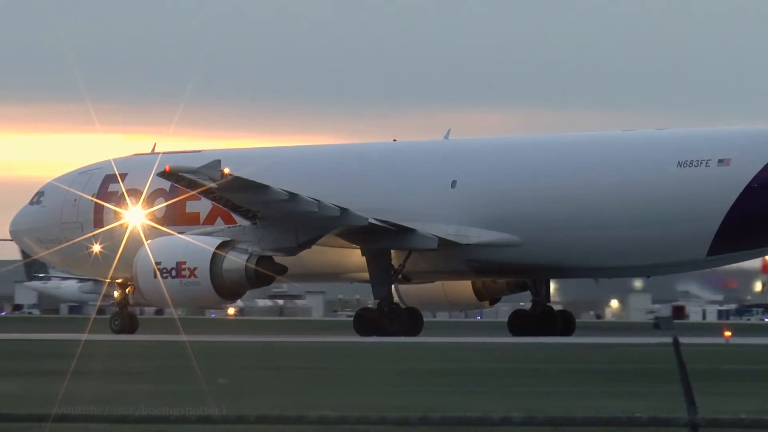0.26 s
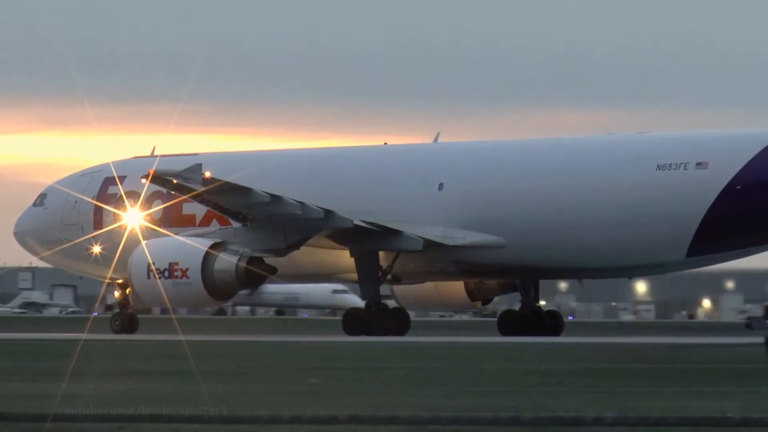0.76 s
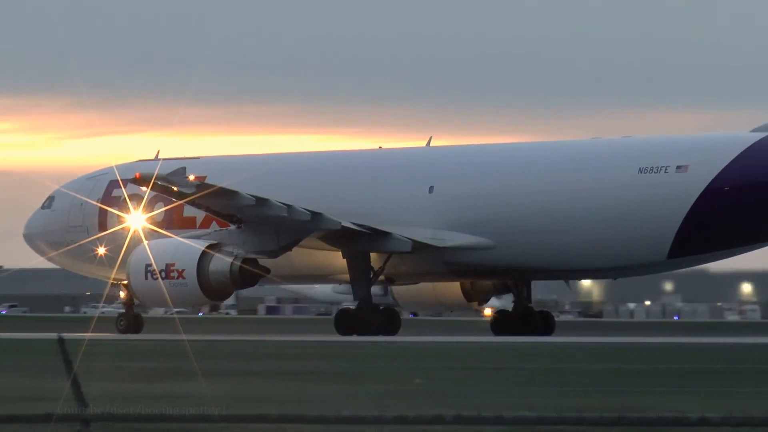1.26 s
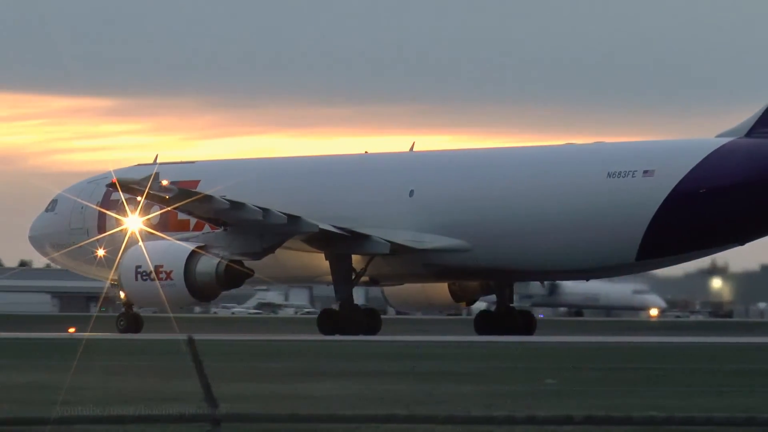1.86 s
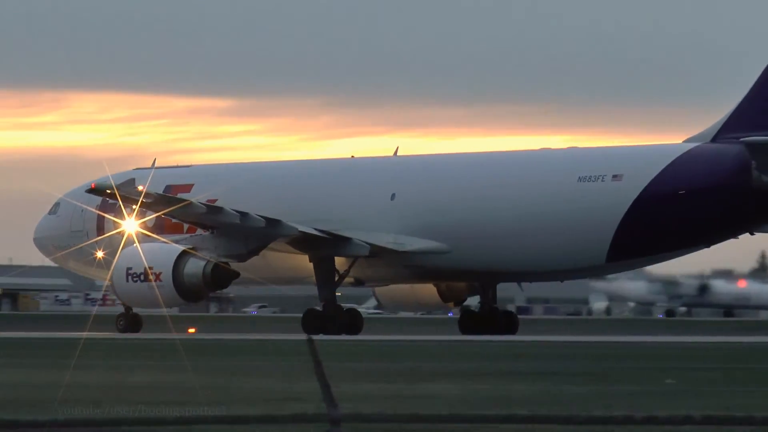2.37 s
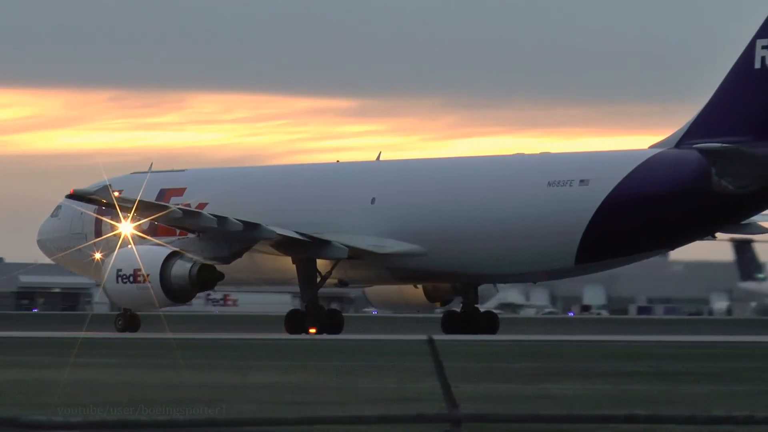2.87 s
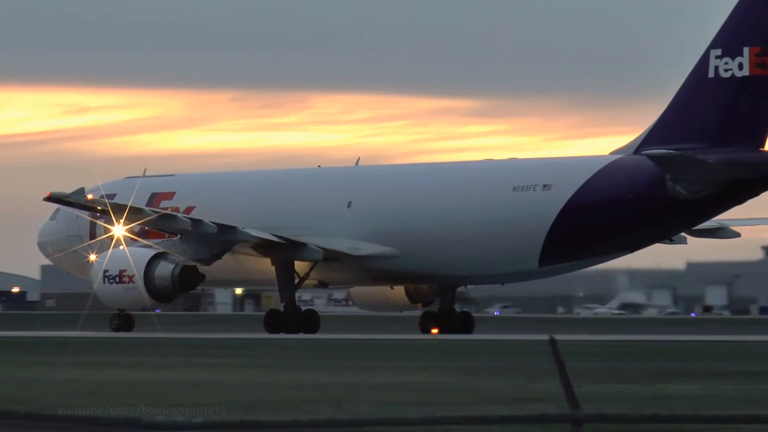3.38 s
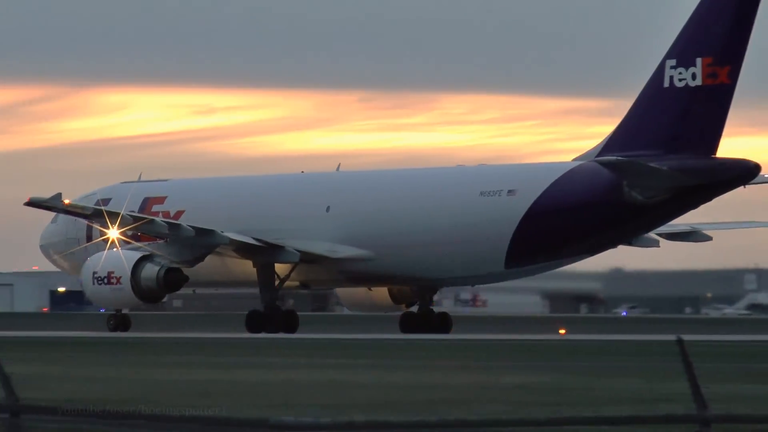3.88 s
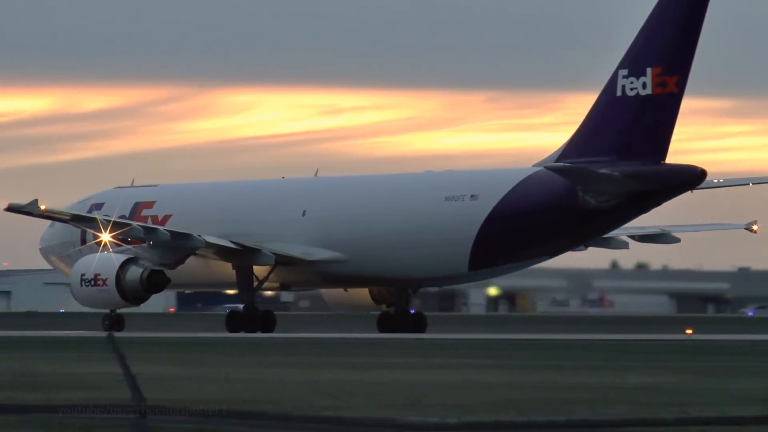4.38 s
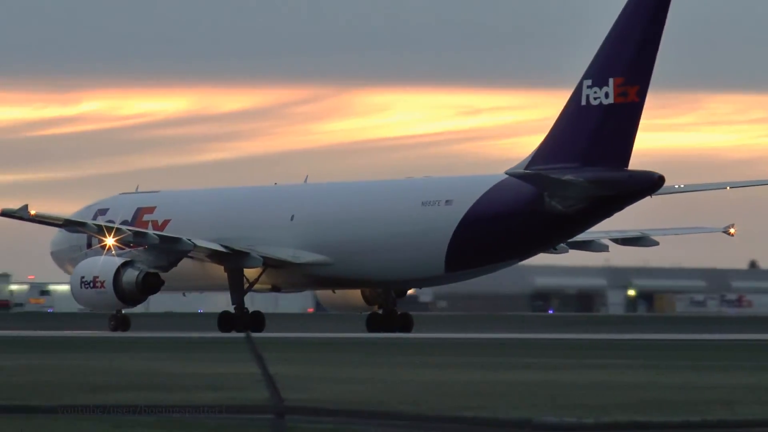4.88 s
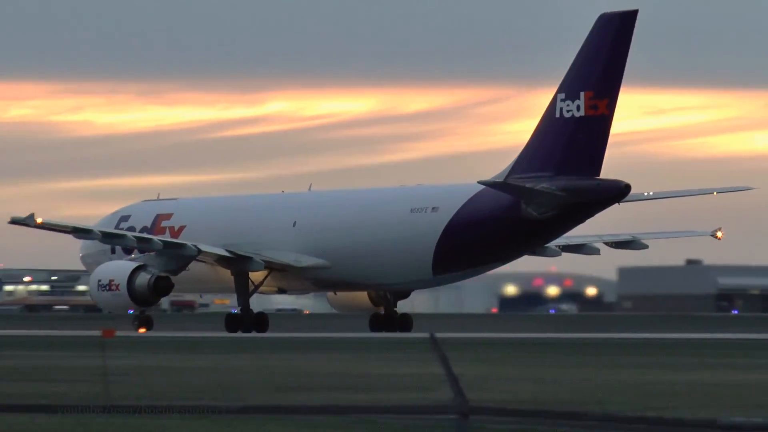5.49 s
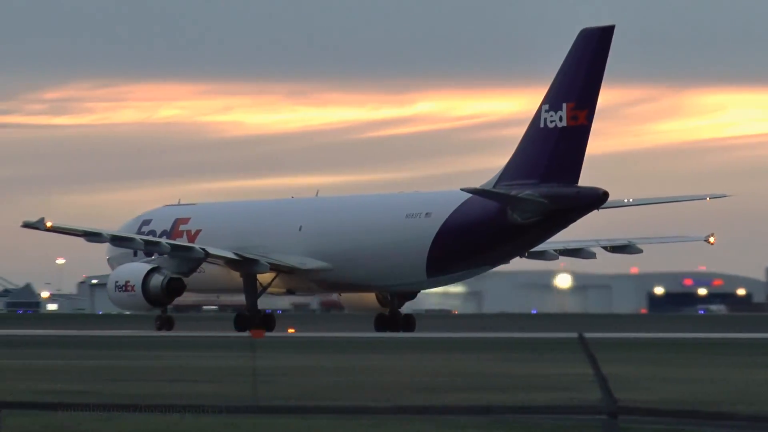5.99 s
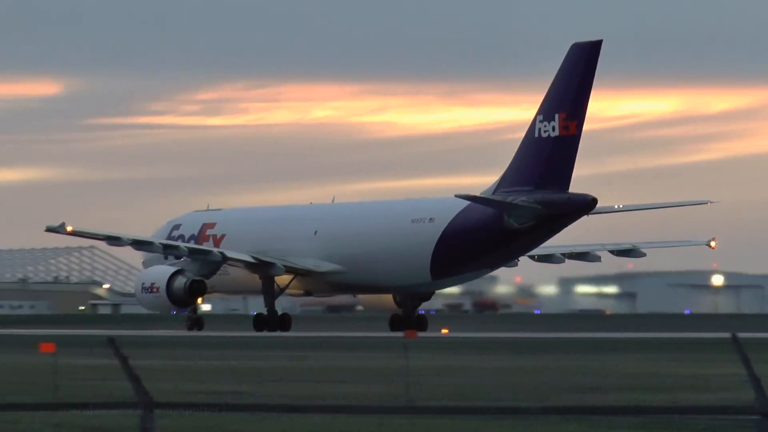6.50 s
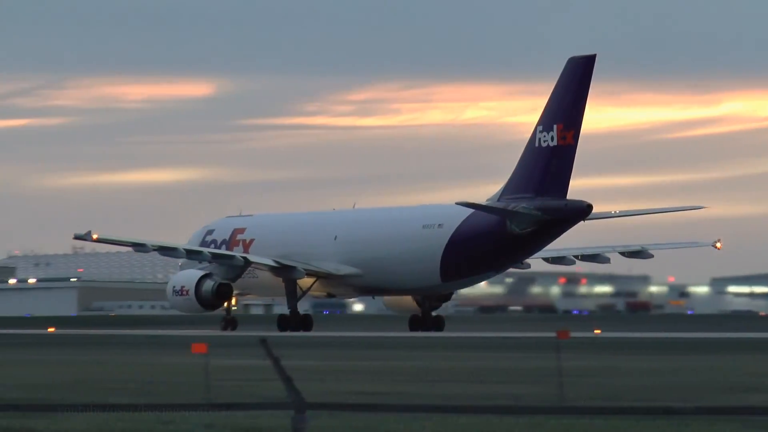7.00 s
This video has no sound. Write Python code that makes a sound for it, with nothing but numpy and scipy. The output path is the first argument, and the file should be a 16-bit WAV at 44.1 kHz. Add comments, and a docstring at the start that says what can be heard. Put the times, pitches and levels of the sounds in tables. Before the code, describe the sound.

Heavy, buffeting jet exhaust rumble and a hoarse roar, bright at first, grow duller as a large aircraft accelerates into the distance.

```python
"""Beside an airport runway, across the grass: a twin-jet airliner spools up and rolls away.
The exhaust rumbles in the bass and roars in the middle: both are shaped noise that swells and sinks.
A fan whines as wavering tones wrapped in noise, and the treble fades with distance.
Strong surges of the rumble overload a small microphone: troughs are clipped, the gain control ducks.
Faint hisses, a low flutter, a few puffs of air and tiny electronic ticks lie underneath."""
import sys
import numpy as np
from scipy import signal
from scipy.fft import rfft, irfft, next_fast_len
from scipy.io import wavfile
from scipy.ndimage import uniform_filter1d

SR = 44100
rng = np.random.default_rng(int(sys.argv[2]) if len(sys.argv) > 2 else 0)


def wav_out(sig):
    """Save sig, one row per channel (or a flat mono array), as 16-bit PCM at SR to the path in sys.argv[1]."""
    wavfile.write(sys.argv[1], SR, np.round(np.clip(np.atleast_2d(sig).T, -1, 1) * 32767).astype(np.int16))


N = 319725  # length in samples
TIME_S = np.arange(N) / SR


def from_db(db):
    """Turn a level in dB into a gain."""
    return 10 ** (np.asarray(db) / 20)


def rms_one(x):
    """Scale a sound to an rms of 1."""
    return x / np.sqrt(np.mean(x ** 2) + 1e-20)


def in_time(rows):
    """Draw straight lines through a table whose first column is time; one curve per other column."""
    row_s, *columns = np.transpose(rows)
    return [np.interp(TIME_S, row_s, column) for column in columns]


def drift(corner_hz):
    """Slow random wandering, rms about 1: noise at every 40th sample, smoothed twice by a low-pass."""
    r = np.exp(-80 * np.pi * corner_hz / SR)
    noise = rng.standard_normal(N // 40 + 2002)
    slow = signal.lfilter([1], [1, -2 * r, r * r], noise)[2000:]  # drop the filter's start
    return np.interp(np.arange(N) / 40, np.arange(len(slow)), rms_one(slow))


def noise_bands(spectrum):
    """Split shaped noise of total rms about 1 into overlapping half-octave bands: (centre Hz, band)."""
    size = next_fast_len(N)
    hz = np.maximum(np.arange(size // 2 + 1) * SR / size, 1)
    point_hz, point_db = np.transpose(spectrum)
    shape = from_db(np.interp(np.log(hz), np.log(point_hz), point_db, left=-200, right=-200))
    noise = rfft(rng.standard_normal(size)) * shape / np.sqrt(np.mean(shape ** 2))
    first_step = np.floor(2 * np.log2(point_hz[0]))
    for step in np.arange(first_step, 2 * np.log2(point_hz[-1]) + 1):
        share = np.clip(1 - abs(2 * np.log2(hz) - step), 0, 1)
        yield 2 ** (step / 2), irfft(noise * share, size)[:N]


def halo(phase, corner_hz):
    """Noise crowded round a tone, rms about 1: the tone's two quarter-turn parts wander at random."""
    return drift(corner_hz) * np.sin(phase) + drift(corner_hz) * np.cos(phase)


# strong pressure surges in the rumble:
# trough_s [s], swell_db [dB], pitch_hz [Hz], lead_cycles [cycles by which the swell leads the trough]
SURGE_LIST = [(0.374, 1, 105, 0.13), (.625, -2.5, 94, 0.33), (0.837, -5, 143, 0.39),
              (0.883, -4, 123, 0.032), (1.059, -2.5, 119, -0.14), (1.155, -4.5, 139, 0.036),
              (1.293, -5, 120, 0.074), (1.332, -2, 119, -0.11), (1.381, -4.5, 109, 0.053),
              (1.421, -4, 110, 0.025), (1.505, -1.5, 110, -0.11), (1.665, -2.5, 122, 0.058),
              (1.731, -2, 95, 0.12), (1.854, -1.5, 100, -0.081), (1.942, -3, 107, 0.25),
              (2.096, -3, 132, 0.14), (2.191, -5, 109.5, -0.21), (2.239, -4, 81.4, 0.041),
              (2.372, -2.5, 130, -0.015), (2.455, -1.5, 75, 0.031), (2.53, -5, 112, -0.049),
              (2.594, -6.5, 110, 0), (2.614, -1.5, 63.4, -0.22), (2.643, -3.5, 130, 0.32),
              (2.733, -5, 82.6, 0), (2.86, -4.5, 85, -0.051), (2.882, -2.5, 99, 0.22),
              (3.025, -5, 100, -0.033), (3.086, -2.5, 120, 0.13), (3.208, -3.5, 130, 0.023),
              (3.245, -4.5, 90, -0.03), (3.279, -5.5, 110, 0.29), (3.359, -6, 102, 0),
              (3.395, -2, 110, 0.2), (3.52, -3, 120, 0.13), (3.584, -1.5, 109, -0.28),
              (3.698, -3, 100.5, 0.018), (3.716, -3.5, 110, -0.029), (3.745, -1.5, 97, 0.059),
              (3.757, -2.5, 106.5, 0.23), (3.855, -1, 101, 0.34), (3.956, -1.5, 91, -0.23),
              (4.109, -2.5, 76.4, -0.016), (4.175, -4.5, 107, -0.1), (4.283, -2.5, 96, 0.039),
              (4.573, -3, 96.5, 0.11), (4.665, -6, 102, -0.059), (4.74, -3, 107, 0.13),
              (4.844, -4.5, 101, 0.069), (4.903, -2.5, 105, -0.034), (5.111, -5, 85.6, -0.048),
              (5.182, -2.5, 81, -0.16), (5.346, -3.5, 80, 0.039), (5.572, -5, 106, -0.0073),
              (5.654, -2, 120, 0.028), (5.961, -5, 93, 0.018), (6.023, -4, 98, 0.19),
              (6.096, -2, 90, -0.014), (6.421, -4.5, 99, -0.084), (6.672, -2.5, 115, 0.37),
              (6.7228, -1.5, 84, 0.35), (6.748, -4.5, 91, 0.08), (6.84, -1, 91, -0.032),
              (7.065, -4.5, 109, 0.073)]


def surges():
    """Eddies fall into step as one tall swell; also returns the gain that makes room for it."""
    swell, calm = np.zeros(N), np.ones(N)
    for trough_s, swell_db, pitch_hz, lead_cycles in SURGE_LIST:
        near = slice(max(round((trough_s - .04) * SR), 0), round((trough_s + .04) * SR))
        cycles = (TIME_S[near] - trough_s) * pitch_hz
        bell = np.exp(-((cycles + lead_cycles) / .62) ** 2)
        swell[near] -= from_db(swell_db) * bell * np.cos(2 * np.pi * cycles)
        calm[near] *= 1 - np.sqrt(bell)
    return swell, calm


# colour of the exhaust rumble, only the shape counts: pitch_hz [Hz], density_db [dB per Hz]
RUMBLE_COLOUR = [(9.4, -48.5), (16, -31.5), (51, -2.5), (95, 1), (175, -7), (234, -14.5), (275, -24.5),
                 (330, -37), (430, -68.5), (730, -120)]
# the rumble deepens as the aircraft leaves; levels are before its waves are evened out:
# start_s [s], level_db [dB], tilt_db [dB per octave]
RUMBLE_COURSE = [(0, -15, 3), (1.5, -12.5, 2), (2.4, -13, 1), (3.3, -10, -1), (4.2, -11.5, -2),
                 (4.9, -13.5, -3), (5.6, -15, -4), (6.5, -13, -3), (7.25, -13, -7)]
RUMBLE_MIDDLE_HZ = 91  # the tilt turns about this pitch
WAVE_TOP_DB = -4.5  # between surges the waves level off at this height


def rumble():
    """Large exhaust eddies: low noise with its waves kept to an even height, broken by taller surges."""
    level_db, tilt_db = in_time(RUMBLE_COURSE)
    eddies = 0
    for hz, band in noise_bands(RUMBLE_COLOUR):
        band_db = 1.1 * drift(7.2) + tilt_db * np.log2(hz / RUMBLE_MIDDLE_HZ)
        eddies = eddies + band * from_db(band_db)
    eddies = from_db(level_db) * eddies
    outline = abs(signal.hilbert(eddies, next_fast_len(N))[:N])
    height = uniform_filter1d(outline, size=200)
    eddies = eddies / (1 + (height / from_db(WAVE_TOP_DB)) ** 4) ** (1 / 4)
    swell, calm = surges()
    return eddies * calm + swell


# colour of the roar far off, only the shape counts: pitch_hz [Hz], density_db [dB per Hz]
ROAR_COLOUR = [(200, -40.5), (280, -13.5), (400, -8.5), (560, -6.5), (750, -7.5), (950, -5), (1280, -2),
               (1670, -3), (1980, -6), (2580, -11), (3100, -12.5), (3400, -14.5), (3750, -18.5),
               (4000, -24), (4740, -34.5), (6160, -45), (8000, -56.5), (10500, -71), (15000, -77.5)]
# how nearness recolours the roar, as air and grass take less: pitch_hz [Hz], change_db [dB when abreast]
NEAR_COLOUR = [(280, 1), (700, 3.5), (1400, 2.5), (2500, -2.5), (3200, 4), (3900, 9), (5000, 13.5),
               (7000, 16), (9000, 11), (13000, 8)]
# the roar swells and sinks as the air carries it, before recolouring: start_s [s], level_db [dB]
ROAR_COURSE = [(0, -28.5), (.33, -26.5), (.6, -28.5), (.9, -29), (1.25, -27.5), (1.7, -27), (1.95, -28),
               (2.2, -29.5), (2.45, -28.5), (2.7, -27.5), (2.92, -30.5), (3.1, -26.5), (3.3, -28.5),
               (3.5, -29), (3.8, -28.5), (4.15, -29.5), (4.4, -29.5), (4.6, -29), (4.82, -30.5),
               (4.95, -31), (5.3, -32.5), (5.9, -33), (6.15, -34), (6.45, -31.5), (6.7, -30), (6.83, -31.5),
               (7, -34), (7.25, -32)]
LEAVING_S = 2.85  # nearness falls from 1 (abreast) as a bell of this width


def roar():
    """Mixing noise of the jets: turbulent air makes it patchy and distance changes its colour."""
    level_db, = in_time(ROAR_COURSE)
    nearness = np.exp(-(TIME_S / LEAVING_S) ** 2)
    near_hz, near_db = np.transpose(NEAR_COLOUR)
    gusts_db = 0.16 * drift(1.0) + 0.22 * drift(22)  # shared by all bands
    out = 0
    for hz, band in noise_bands(ROAR_COLOUR):
        change_db = np.interp(np.log(hz), np.log(near_hz), near_db)
        out = out + band * from_db(gusts_db + .5 * drift(3.0) + nearness * change_db)
    return from_db(level_db) * out


# the fan speeds up, then slowly sags as the aircraft draws away: start_s [s], pitch_hz [Hz, blade passing]
FAN_PITCH = [(0, 1640), (.4, 1683), (1, 1747), (1.3, 1780), (1.6, 1806), (2.2, 1850), (3, 1905),
             (4.7, 1950), (6.6, 1913), (7.25, 1900)]
# the two lower fan tones fade in and out: start_s [s], blade_tone_db [dB], octave_db [dB]
LOWER_TONES = [(0, -33, -36.5), (.1, -32, -38.5), (.15, -33, -43), (.22, -34.5, -39), (.33, -30, -37.5),
               (.45, -33.5, -40), (.56, -32, -40), (.65, -34, -40.5), (.76, -30.5, -33), (.83, -32, -33.5),
               (.9, -37, -34.5), (1.04, -35.5, -35), (1.1, -35.5, -47), (1.25, -38, -44),
               (1.35, -36.5, -43), (1.43, -45, -39.5), (1.58, -42, -36.5), (1.7, -46, -40),
               (1.78, -45, -51), (2.1, -50, -59), (3, -53, -55), (4.2, -58, -66.5), (5.1, -46, -72.5),
               (5.6, -48, -75), (6, -44, -77), (6.5, -44, -79), (6.7, -55, -80), (7.25, -57, -84)]
# third to sixth fan tones, steady and then lost: level_db [dB], fade_start_s [s], loss_db [dB per s]
UPPER_TONES = [(-64.5, 1.5, 2.5), (-62, 1.3, 18.5), (-73.5, .5, 8.5), (-82, .3, 12.5)]
# how the air blurs each fan tone, lowest first:
# line_share [0-1 of the power left as a clear tone], halo_hz [Hz, corner of the halo's wandering]
TONE_BLUR = [(.85, 35), (.85, 80), (.1, 250), (.15, 300), (0, 350), (0, 350)]


def fan():
    """Blade tone and its multiples, scattered by air into fluttering lines and halos of noise."""
    pitch_hz, = in_time(FAN_PITCH)
    levels_db = in_time(LOWER_TONES)
    for level_db, fade_start_s, loss_db in UPPER_TONES:
        levels_db.append(level_db - loss_db * np.maximum(TIME_S - fade_start_s, 0))
    out = 0
    for order, (level_db, (line_share, halo_hz)) in enumerate(zip(levels_db, TONE_BLUR), 1):
        tone_hz = order * pitch_hz * (1 + 0.0008 * drift(21))
        phase = 2 * np.pi * np.cumsum(tone_hz) / SR
        line = np.sqrt(2) * from_db(0.9 * drift(14)) * np.sin(phase)
        tone = np.sqrt(line_share) * line + np.sqrt(1 - line_share) * halo(phase, halo_hz)
        out = out + from_db(level_db) * tone
    return out


# a puff of air on the right port only: centre_s [s], peak_db [dB], pitch_hz [Hz], half_length_s [s]
PUFF_LIST = [(3.2515, -23, 330, 0.0033), (3.879, -17, 290, 0.0033), (6.723, -4, 40, 0.0029)]


def puffs():
    """Each puff is a short bell of pressure with a wobble in it."""
    out = np.zeros(N)
    for centre_s, peak_db, pitch_hz, half_length_s in PUFF_LIST:
        from_centre_s = TIME_S - centre_s
        bell = np.exp(-(from_centre_s / half_length_s) ** 2)
        out += from_db(peak_db) * bell * np.cos(2 * np.pi * pitch_hz * from_centre_s)
    return out


# colour of the flutter between the ports, only the shape counts: pitch_hz [Hz], density_db [dB per Hz]
FLUTTER_COLOUR = [(12, -30), (20, 5.5), (100, 8.5), (189, -13), (291, -19), (528, -37), (700, -32.5),
                  (910, -59.5), (1540, -120)]
FLUTTER_DB = -60.5  # typical level, which wanders


def port_flutter():
    """Faint low noise of wandering level, to be heard with opposite sign in the two ports."""
    level_db = FLUTTER_DB + 2.5 * drift(6)
    return from_db(level_db) * sum(band for hz, band in noise_bands(FLUTTER_COLOUR))


# narrow hisses, bared once the roar has dulled:
# pitch_hz [Hz], corner_hz [Hz, corner of the wandering], start_db [dB], loss_db [dB per s]
HISS_BANDS = [(4840, 250, -64, 0.5), (6100, 280, -69.5, 3.7)]


def narrow_hiss():
    """Bands of hiss at fixed pitches: noise crowded round a tone, slowly fading."""
    out = 0
    for pitch_hz, corner_hz, start_db, loss_db in HISS_BANDS:
        band = halo(2 * np.pi * pitch_hz * TIME_S, corner_hz)
        out = out + from_db(start_db - loss_db * TIME_S) * band
    return out


def scene():
    """One far source reaches both ports alike; bass is a little fuller on the right, flutter opposes."""
    bass = rumble() * from_db([[-.1], [.1]])  # left, right
    both = roar() + fan() + narrow_hiss()
    return bass + port_flutter() * [[1], [-1]] + both + puffs() * [[0], [1]]


CLIP_LOW, CLIP_HIGH = .47, .6  # room for troughs and for crests, in wave height
HOLD_DB, DUCK_SHARE = -5.5, 0.99  # level held (for troughs), share of the excess taken away
ATTACK_S, RELEASE_DB_PER_S, STEP_DB = 0.00041, 34, .15


def released(cut_db):
    """Take a gain cut at once and give it back at a steady rate."""
    ramp_db = RELEASE_DB_PER_S * TIME_S
    return np.maximum.accumulate(cut_db + ramp_db) - ramp_db


def gain_control(x):
    """Peaks, troughs sooner than crests, cut the gain in small sudden steps; it climbs back smoothly."""
    height = abs(x / np.where(x < 0, 1, CLIP_HIGH / CLIP_LOW)).max(0)  # the taller of the two ports
    over_db = np.maximum(20 * np.log10(height + 1e-9) - HOLD_DB, 0)
    r = np.exp(-1 / (ATTACK_S * SR))
    wanted_db = signal.lfilter([1 - r], [1, -r], released(DUCK_SHARE * over_db))
    stepped_db = STEP_DB * np.floor(wanted_db / STEP_DB)
    return x * from_db(-released(stepped_db))


def amplifier(x):
    """Flatten tall waves, with less room below than above."""
    top, knee = np.where(x < 0, CLIP_LOW, CLIP_HIGH), 40  # a high knee clips abruptly
    return x / (1 + abs(x / top) ** knee) ** (1 / knee)


TICK_ABOVE = .2  # wave height that brings a tick
TICK_DB, TICK_SPREAD_DB, TICK_DECAY_S = -39.5, 5.5, .001  # typical size for a wave height of 1


def ticks(x):
    """The electronics tick faintly where a tall bass wave turns, on average louder the taller it is."""
    wave = uniform_filter1d(x.mean(0), size=90)
    turns = signal.find_peaks(abs(wave), height=TICK_ABOVE, distance=150)[0]
    tick_db = TICK_DB + TICK_SPREAD_DB * rng.standard_normal(len(turns))
    jumps = np.zeros(N)
    jumps[turns] = -wave[turns] * abs(wave[turns]) * from_db(tick_db)
    return signal.lfilter([1], [1, -np.exp(-1 / (TICK_DECAY_S * SR))], jumps + 1e-18)


HISS_DB = -82.5  # background hiss, alike in both ports
COUPLING_HZ, CUTOFF_HZ = 9, 15900  # low cut, and where the treble is gone


def record(dry):
    """The microphone: gain control too slow for the first peak, clipping, ticks, hiss, the top cut."""
    x = amplifier(gain_control(dry))
    x = x + ticks(x)
    x = signal.lfilter(*signal.butter(1, COUPLING_HZ, "high", fs=SR), x)  # tilts the flat troughs
    hiss = rms_one(signal.lfilter([1], [1, -.5], rng.standard_normal(N)))
    x = x + from_db(HISS_DB) * hiss
    top_cut = signal.cheby2(20, 40, CUTOFF_HZ, fs=SR, output="sos")
    return signal.sosfiltfilt(top_cut, x)


dry = scene()
out = record(dry)
wav_out(out)
```